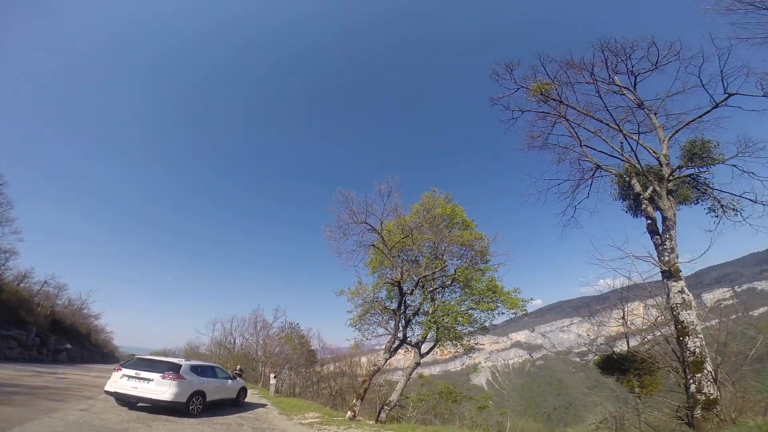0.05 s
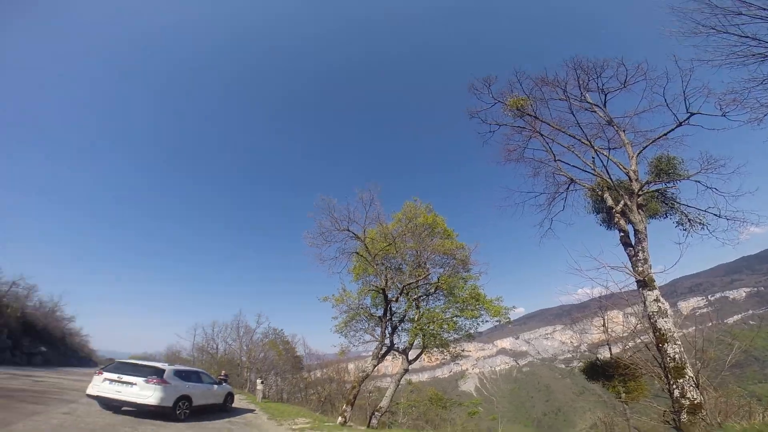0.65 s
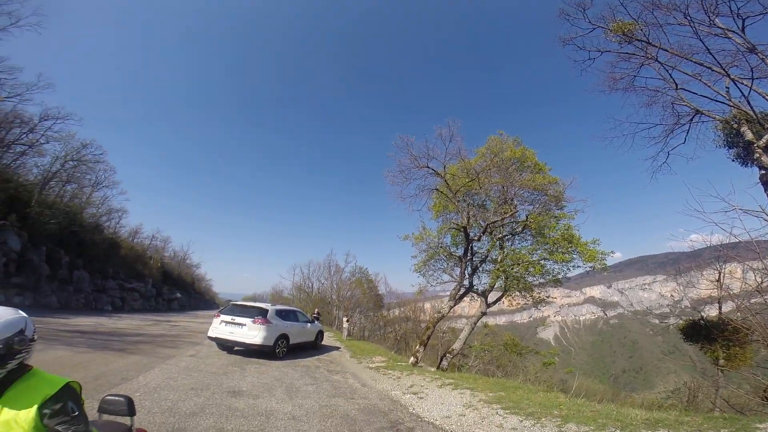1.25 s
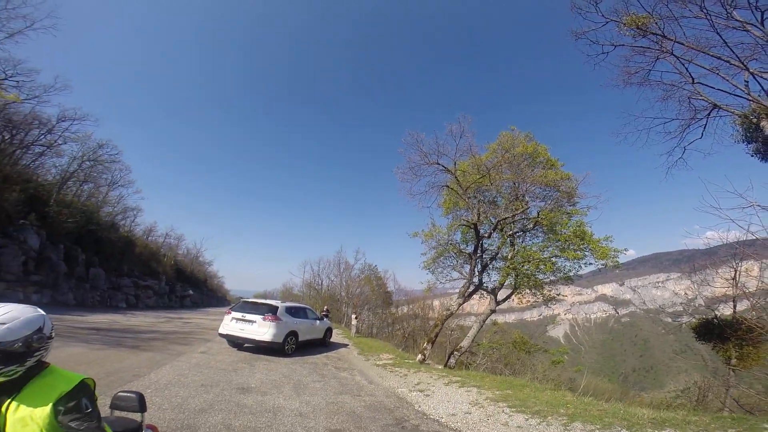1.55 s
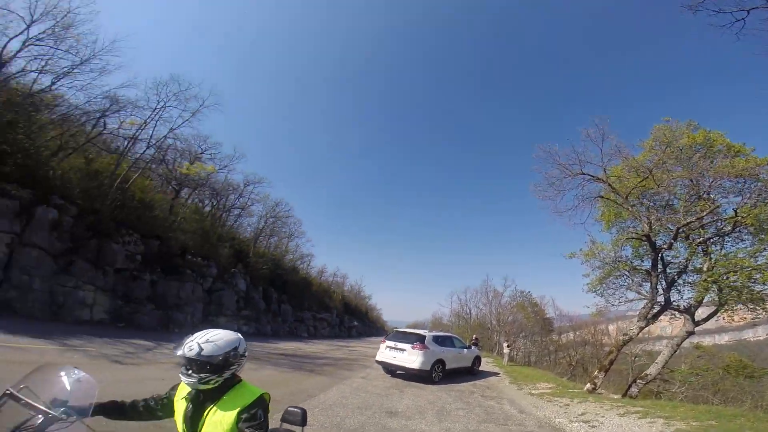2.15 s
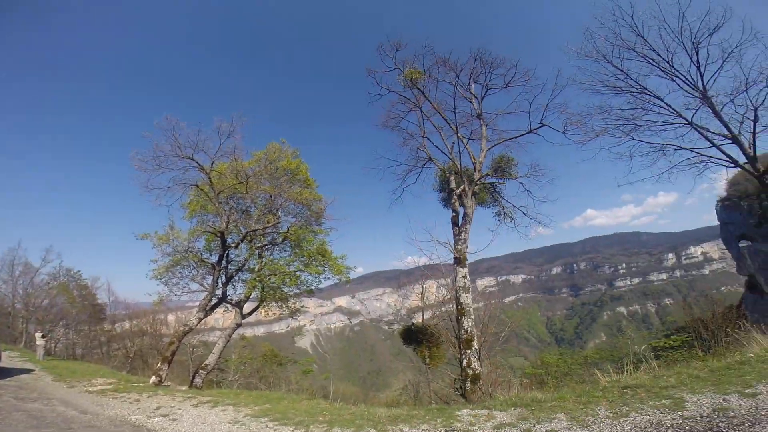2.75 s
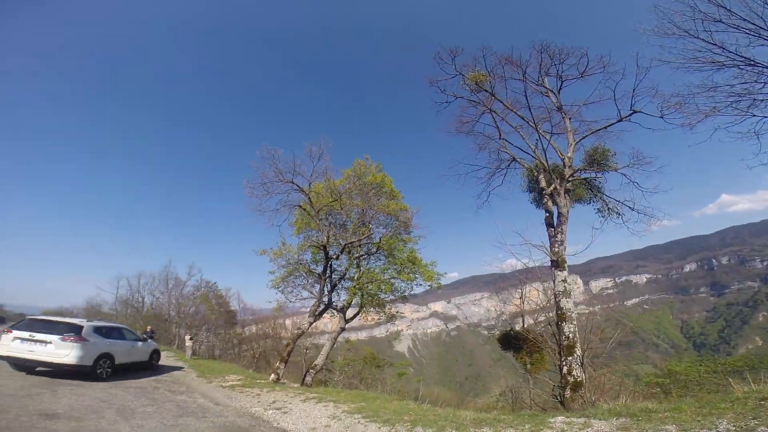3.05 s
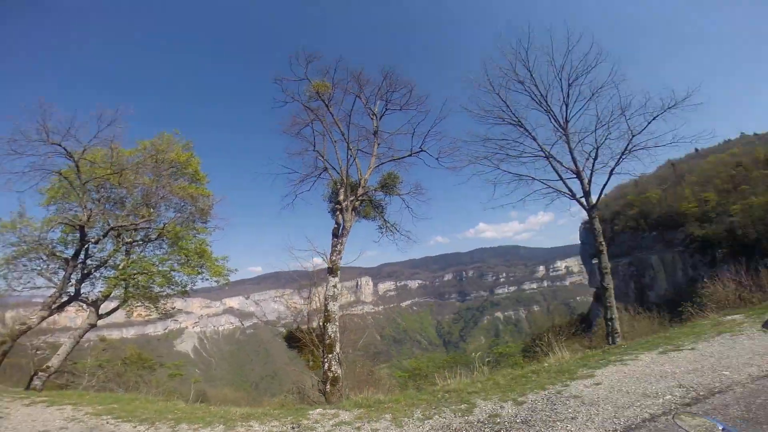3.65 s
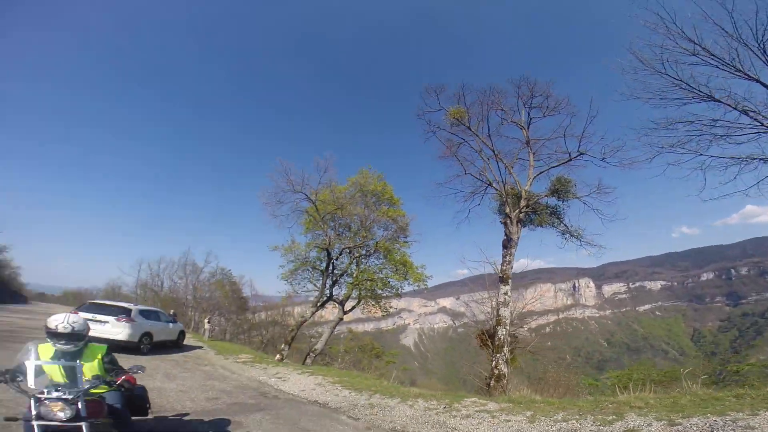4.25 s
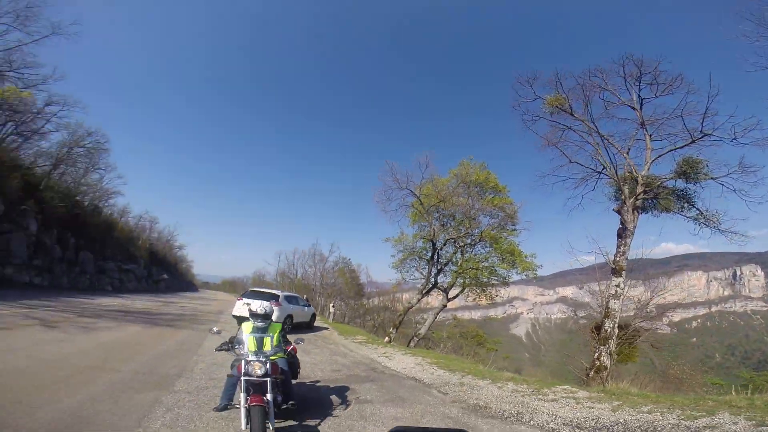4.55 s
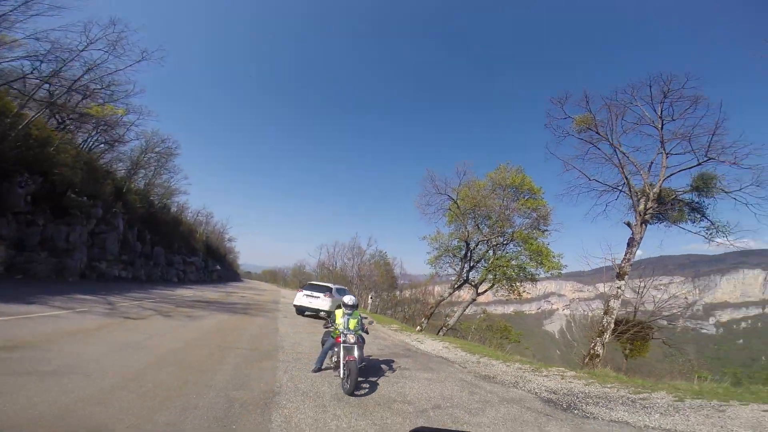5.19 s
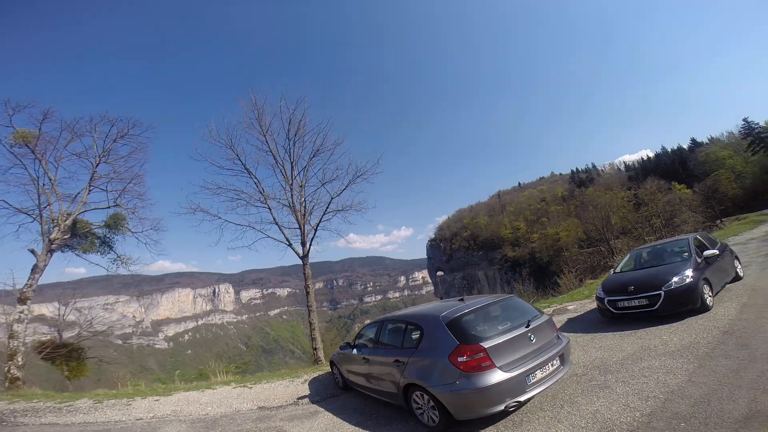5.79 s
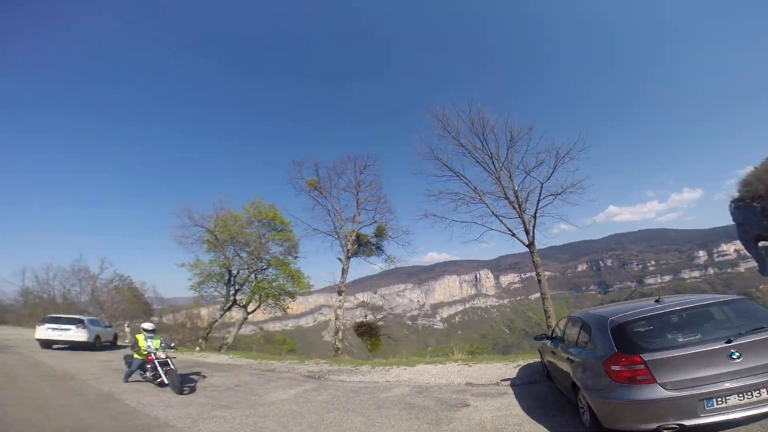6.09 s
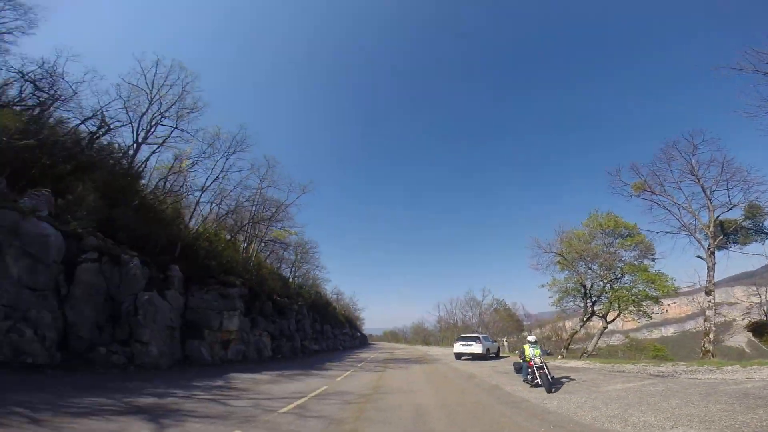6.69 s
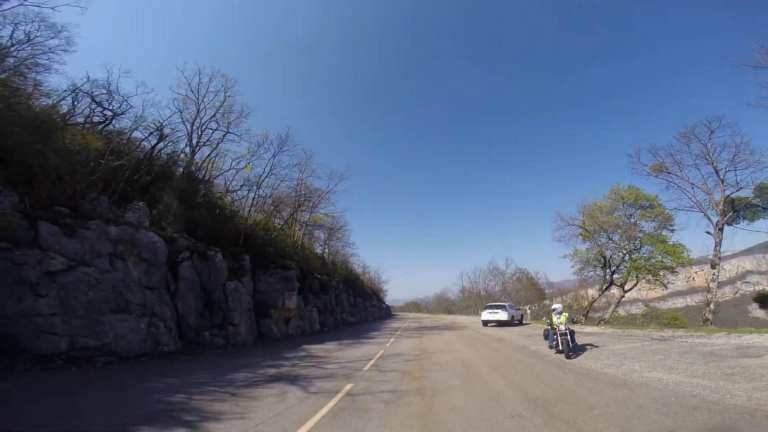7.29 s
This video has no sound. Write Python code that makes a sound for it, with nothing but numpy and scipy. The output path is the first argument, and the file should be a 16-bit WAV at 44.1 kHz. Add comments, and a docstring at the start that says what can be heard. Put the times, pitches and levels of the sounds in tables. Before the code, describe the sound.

A chugging motorcycle sputters, catches and rides off slowly, its raspy exhaust beat fading and slowing to an idle.

```python
"""By a mountain road, a V-twin motorcycle chugs at low idle, stumbles and spits, catches and pulls away,
then drops back to idle. Its two cylinders fire in uneven pairs: each firing thumps its exhaust pipe
and, under load, barks from the muffler with a jet of gas, ringing baffles and a rasp.
Sharp clacks, engine clatter, gear whine, a drone, a low rumble and a faint high whine lie underneath."""
import sys
import numpy as np
from scipy import signal
from scipy.fft import rfft, irfft, next_fast_len
from scipy.io import wavfile
from scipy.ndimage import map_coordinates

SR = 44100
rng = np.random.default_rng(int(sys.argv[2]) if len(sys.argv) > 2 else 0)


def wav_record(signal):
    """Record a signal, one row per channel, as 16-bit PCM in the file named by sys.argv[1]."""
    frames = np.transpose(np.atleast_2d(signal))
    bounded = np.clip(frames, -1, 1)
    # unit amplitude maps onto the largest positive 16-bit level
    quanta = np.round(bounded * 32767).astype(np.int16)
    wavfile.write(sys.argv[1], SR, quanta)


N = 323253
LEAVE_S = 4.19  # the bike is leaving: bark and rasp fade from here on

# crankshaft speed: time_s, speed_rpm
CRANK_SPEED = [(0.0, 1111.9), (0.66, 948.9), (1.15, 1012.2), (1.27, 1381.7), (1.67, 985.1), (1.82, 1430.5),
               (2.13, 1473.0), (2.38, 1455.3), (2.61, 1631.1), (2.99, 1676.8), (3.19, 1617.0),
               (3.5, 1633.2), (3.71, 1501.1), (4.16, 1352.4), (4.67, 1253.7), (4.91, 1304.9),
               (5.58, 1354.2), (5.95, 1302.6), (6.17, 1052.9), (6.61, 1157.9), (6.82, 953.4), (7.33, 917.2)]
# the listener swings round: time_s, facing (-1 turned away from the bike, 1 towards it)
LISTENER_FACING = [(0, 0), (3.9, 0.12), (4.35, 0.47), (4.8, 1), (5.2, 0.32), (5.6, -1), (6.2, -.8),
                   (6.6, 0)]


def crank():
    """Four-stroke cycles gone by (two turns each); whole numbers are the rear cylinder's firings."""
    return np.cumsum(curves(CRANK_SPEED)[0]) / (2 * 60 * SR) + 0.503


def firings(cycle):
    """Sample indices at which a cycle count passes a whole number."""
    return np.flatnonzero(np.diff(np.floor(cycle)) > 0)


def throttled(idle, wide_open, power=1):
    """A setting that rides the throttle from its idle value to its wide-open value."""
    # a blip that chokes, the catch, full pull, easing off, back to idle: time_s, opening (0 to 1)
    throttle = [(0, .02), (1.12, 0.05), (1.24, 0.75), (1.5, 0.12), (1.63, 0), (1.75, 0.61), (2.0, 0.38),
                (2.26, 0.36), (2.5, 0.97), (3.55, 1), (3.78, 0.9), (4.3, 0.73), (5.1, 0.59), (5.85, 0.65),
                (6.1, 0.2), (6.52, 0.15), (6.65, 0.03)]
    return idle + (wide_open - idle) * np.clip(curves(throttle)[0], 0, 1) ** power


def choking():
    """1 while the engine stumbles after the blip, else 0."""
    return (since(1.31) > 0) * (since(1.61) == 0)


def uneven_burn(reach=512):
    """Change in dB of thump and of bark where the engine chokes, misfires or cracks out."""
    # firings that barely burn: time_s, thump_lost_db, bark_lost_db
    misfires = [(.47, 8, 6), (1.52, 1, 21), (1.58, 9, 8), (6.65, -0.5, 13), (6.83, 6, 4), (7.08, 16, 4),
                (7.13, 2, 5)]
    # firings that crack harder than their neighbours: time_s, extra_bark_db
    cracks = [(1.745, 2), (2.49, 0), (2.538, 3), (2.61, 3.5), (2.642, 1), (2.685, 2.5), (2.757, 3.5),
              (2.903, 4), (3.074, -0.5), (3.444, -0.5), (3.914, 3.5), (3.997, 2), (4.968, 2.5), (5.37, 2.5),
              (5.82, 5)]
    thump_db, bark_db = -8.5 * choking(), np.zeros(N)
    for time_s, thump_lost_db, bark_lost_db in misfires:
        add(thump_db, time_s * SR - reach, np.full(2 * reach, -thump_lost_db))
        add(bark_db, time_s * SR - reach, np.full(2 * reach, -bark_lost_db))
    for time_s, extra_db in cracks:
        add(bark_db, time_s * SR - reach, np.full(2 * reach, extra_db))
    return thump_db, bark_db


def exhaust(cycle, front_lead=0.405):
    """The front cylinder fires, then the rear, then a longer gap; the throttle sets their punch."""
    # modes of each cylinder's exhaust pipe: pitch_hz, width_hz, level_db
    rear_pipe = [(71.7, 25.4, 13), (87.9, 40, 11.5), (106.2, 61, 6.5), (174.4, 50, 12.5), (285, 22, 2.5)]
    front_pipe = [(61.4, 11, 3.5), (158.9, 18.4, 11), (116, 40, -0.5), (263.4, 40, 8.5)]
    thump_db, bark_db = uneven_burn()
    bark_db -= 1.66 * since(LEAVE_S)
    rear, front = firings(cycle), firings(cycle + front_lead)
    out = thumps(rear, throttled(-25, -17.5, 0.81) + thump_db, rear_pipe, scatter_db=0.1, detune=0.0032)
    out += thumps(front, throttled(-33, -19.5, 0.47) + thump_db, front_pipe, scatter_db=0.6, detune=0.0019)
    out += muffler(rear, throttled(-42.5, -25.5, 0.97) + bark_db)
    out += muffler(front, throttled(-55.5, -28, 0.7) + bark_db)
    return out


def push_sharpness(idle_hz=143, open_hz=236, turn_start_s=2.2, turn_length_s=1.8):
    """Bandwidth in Hz of each push of gas: wider under throttle, narrower as the pipe turns away."""
    turned = np.minimum(since(turn_start_s) / turn_length_s, 1)
    return idle_hz + throttled(0, open_hz - idle_hz, 0.38) * (1 - 0.76 * turned)


def thumps(starts, level_db, pipe, scatter_db, detune, size=6144):
    """Each push of gas rings the pipe; gas heat shifts the pitch a little from firing to firing."""
    hz, out = np.fft.rfftfreq(size, 1 / SR), np.zeros(N)
    lead = size // 16  # samples of room for the push to swell
    push_hz = push_sharpness()
    for start in starts:
        chance = rng.standard_normal(len(pipe) + 1)
        push = np.exp(-(hz / push_hz[start]) ** 2 - 2j * np.pi * hz * lead / SR)
        modes = sum((-1) ** k * amp(db) * resonance(hz, pitch * (1 + detune * chance[k]), width)
                    for k, (pitch, width, db) in enumerate(pipe))
        thump = irfft(modes * push)
        peak = amp(level_db[start] - scatter_db * chance[-1])
        add(out, start - lead, peak * thump / np.abs(thump).max())
    return out


def muffler(starts, level_db):
    """One cylinder's bark: a jet through the shell, ringing baffles and a rasp that builds just after."""
    # colours of the gas jet and of the rasp at the pipe's mouth: frequency_hz, level_db
    jet_colour = [(120, -8.5), (290, -8.5), (450, -9.5), (620, -21.5), (950, -6), (1200, -6), (1310, -11.5),
                  (1500, 3), (2700, 0), (3450, 3.5), (4000, -9), (6800, -33), (15000, -45)]
    rasp_colour = [(1500, -4.5), (3700, -30), (4700, 4.5), (5500, -2.5), (6400, 4.5), (7200, -0.5),
                   (8200, -12), (11000, -12.5), (13000, -24), (15000, -32)]
    # resonances of the muffler shell: pitch_hz, width_hz, level_db
    shell_modes = [(504, 33, 6), (821, 22, 10.5), (998, 84, 5), (1139.5, 30, 14.5), (1886, 44, -4),
                   (2227, 49, -1.5), (2467, 23, 2.5), (3075, 91, 4), (4400, 56, 5), (4660, 170, -12),
                   (6000, 190, -12)]
    rasp_db = level_db + throttled(-8, -9.5) - 2.2 * since(LEAVE_S)
    rasp_db += 2.5 * curves(LISTENER_FACING)[0]
    jet = barks(starts, level_db + 1, rise_s=0.0012, t60_s=0.048, tail_db=-24, tail_t60_s=0.74,
                scatter_db=0.25, patchy_db=4.5)
    rasp = barks(starts, rasp_db, rise_s=0.0047, t60_s=0.039, tail_db=-24.5, tail_t60_s=0.17,
                 scatter_db=3, patchy_db=4)
    gas = ringing(jet, jet_colour, shell_modes) + ringing(rasp, rasp_colour)
    return gas + baffle_pings(starts, level_db)


def barks(starts, level_db, rise_s, t60_s, tail_db, tail_t60_s, scatter_db, patchy_db, size=8192):
    """Each opening exhaust valve frees a turbulent burst with its own colour and a weak scattered tail."""
    t, out = np.arange(size) / SR, np.zeros(N)
    attack = 1 - np.exp(-(t / rise_s) ** 2)
    decay = amp(-60 * t / t60_s) + amp(tail_db - 60 * t / tail_t60_s)
    knots = np.fft.rfftfreq(size, 1 / SR) / 330  # a new random level every 330 Hz
    for start in starts:
        colour_db = patchy_db * map_coordinates(rng.standard_normal(int(knots[-1]) + 2), [knots])
        puff = attack * decay * rng.standard_normal(size)
        burst = irfft(rfft(puff) * amp(colour_db))[:size // 2]
        add(out, start, burst * amp(level_db[start] + scatter_db * rng.standard_normal()))
    return out


def baffle_pings(starts, level_db, scatter_db=5, rise_s=0.0045, pivot_hz=1950):
    """The pressure front strikes the baffles; each tone's strength and pitch vary with every firing."""
    # tones of the muffler baffles: pitch_hz, level_db, t60_s, pitch_scatter (share)
    baffle_tones = [(742.4, -14, 0.12, 0.005), (845.5, -12, 0.14, .003), (1068, 0.5, 0.061, 0.018),
                    (1151, -1, 0.087, 0.005), (1780, -3.5, 0.08, 0.0517), (2630, -0.5, 0.042, 0.0617),
                    (3133, 0.5, 0.044, 0.0056), (3286, 7.5, 0.027, 0.025)]
    hz, db, t60_s, detune = np.transpose(baffle_tones)[:, :, None]
    t, out = np.arange(SR // 8) / SR, np.zeros(N)
    attack = 1 - np.exp(-(t / rise_s) ** 2)
    tilt_db_per_octave = 3.5 + 5 * curves(LISTENER_FACING)[0]  # brighter when facing the bike
    for start in starts:
        strength, shift = rng.standard_normal((2, len(baffle_tones), 1))
        tone_db = db + scatter_db * np.tanh(strength) + tilt_db_per_octave[start] * np.log2(hz / pivot_hz)
        tones = amp(tone_db - 60 * t / t60_s) * np.sin(2 * np.pi * hz * (1 + detune * shift) * t)
        add(out, start, amp(level_db[start]) * attack * tones.sum(0))
    return out


def clacks(rise_s=0.00066):
    """Short, dry bursts: metallic clacks, and the spit of the stumbling engine."""
    # clacks and spits: start_s, level_db, t60_s
    hits = [(0.943, -25.5, 0.026), (0.952, -40, 0.033), (1.321, -31.5, 0.083), (1.329, -37.5, 0.15),
            (1.380, -54, 0.92), (1.409, -42, 0.054), (2.288, -28, 0.048), (2.321, -30.5, 0.091),
            (2.367, -27, 0.028), (4.108, -32, 0.093), (4.283, -39, 0.05), (4.304, -32, 0.071),
            (5.39, -31, 0.04), (6.248, -26.5, 0.025)]
    # their broad colour: frequency_hz, level_db
    colour = [(200, -3), (600, 2), (1080, 7.5), (1320, 2.5), (1800, 1), (3200, 2.5), (4200, -11),
              (6800, -34), (9000, -41), (15000, -47)]
    # ring of the struck metal: pitch_hz, width_hz, level_db
    metal_modes = [(1130, 58, 6), (1750, 97, 9.5)]
    t, envelope = np.arange(SR // 3) / SR, np.zeros(N)
    attack = 1 - np.exp(-t / rise_s)
    for start_s, level_db, t60_s in hits:
        add(envelope, start_s * SR, attack * amp(level_db - 60 * t / t60_s))
    return ringing(envelope * rng.standard_normal(N), colour, metal_modes)


def valve_clatter(cycle, idle_rpm=1000, db_per_doubling=10.5):
    """Valve gear rattles louder with crank speed, flickering and swelling slightly with each turn."""
    # colour of the clatter: frequency_hz, level_db
    colour = [(150, 16.5), (300, 6), (560, 1), (750, 1.5), (1050, 5), (1190, 5), (1310, -7), (1480, 2),
              (1850, 3), (2300, -1), (3200, 2), (4000, -13.5), (4600, -11), (5500, -16.5), (6400, -14.5),
              (8500, -29.5), (15000, -37)]
    level_db = -48 + db_per_doubling * np.log2(curves(CRANK_SPEED)[0] / idle_rpm) + 1.2 * choking()
    swell_db = 0.3 * np.cos(4 * np.pi * cycle) + 1.67 * wobble(140)
    return amp(level_db + swell_db) * noise(colour)


def engine_drone():
    """A low drone fills the gaps between firings, lifting with the throttle and in the stumble."""
    # colour of the drone: frequency_hz, level_db
    colour = [(25, -34), (42, -34), (54, -24), (70, 0), (105, -4), (140, -6.5), (200, -3), (270, -8.5),
              (380, -28.5), (900, -67)]
    return amp(throttled(-45, -42.5, 0.88) + 1.2 * choking()) * noise(colour)


def gear_whine():
    """Meshing gears sing out for moments, gliding a little under a fluttering load."""
    # swells of whine: centre_s, half_length_s, pitch_hz, glide_hz_per_s, level_db
    swells = [(3.35, .3, 454, -0.5, -56.5), (4.169, .15, 384, -89, -57.5), (4.78, 0.23, 380.3, 114.5, -54)]
    t, out = np.arange(N) / SR, np.zeros(N)
    flutter_db, waver = 0.9 * wobble(25.4), 0.9 * wobble(40)
    for centre_s, half_length_s, pitch_hz, glide, level_db in swells:
        phase = 2 * np.pi * np.cumsum(pitch_hz + glide * (t - centre_s)) / SR
        envelope = amp(level_db + flutter_db) * np.exp(-((t - centre_s) / half_length_s) ** 2)
        out += np.sqrt(2) * envelope * np.sin(phase + waver)
    return out


def idle_singing(fade_start_s=1.44, fade_db_per_s=44):
    """A thin metallic singing over the opening idle, dying away as the engine catches."""
    band = filtered(rng.standard_normal(N), lambda hz: resonance(hz, centre=2216, width=91) ** 2)
    return amp(-59 - fade_db_per_s * since(fade_start_s)) * unit(band)


def rumble():
    """A deep rumble swells and sinks under the bike."""
    # colour of the rumble: frequency_hz, level_db
    colour = [(10, -14), (22, -3), (28, 0), (34, -14), (42, -34), (70, -50), (300, -90)]
    # its rise and fall: time_s, level_db
    levels = [(0.0, -44), (1.24, -49), (1.37, -42), (2.55, -47), (2.82, -42), (3.59, -63), (3.71, -38),
              (4.18, -45), (6.8, -45), (7.33, -51)]
    return amp(curves(levels)[0]) * noise(colour)


def microphone_hiss():
    """The faint, even hiss of the microphone."""
    # colour of the hiss: frequency_hz, level_db
    colour = [(200, 6.5), (600, 17.5), (1500, 5), (5000, -6), (7000, -6), (9000, 1.5), (12000, -5.5),
              (15000, -16)]
    return amp(-68) * noise(colour)


def electronic_whine():
    """Electronics give off thin, steady tones high in the treble."""
    # whine tones: pitch_hz, level_db
    tones = [(11688, -88), (11718, -83), (14626, -92)]
    t = np.arange(N) / SR
    return sum(np.sqrt(2) * amp(db) * np.sin(2 * np.pi * hz * t) for hz, db in tones)


def amp(db):
    """Decibels to gain."""
    return 10 ** (np.asarray(db) / 20)


def unit(x):
    """Scale to rms 1."""
    return x / np.sqrt(np.mean(x ** 2) + 1e-20)


def since(time_s):
    """Seconds gone by since a moment, 0 before it."""
    return np.maximum(np.arange(N) / SR - time_s, 0)


def colour_gain(colour, hz):
    """Gain of a (frequency_hz, level_db) colour, read on a log frequency axis."""
    points_hz, db = np.transpose(colour)
    return amp(np.interp(np.log(hz + 1), np.log(points_hz + 1), db))


def curves(rows):
    """One value per sample for each column after the time."""
    time_s, *columns = np.transpose(rows)
    return [np.interp(np.arange(N) / SR, time_s, column) for column in columns]


def wobble(rate):
    """A smooth random curve with rate knots a second."""
    knots, steps = rng.standard_normal(int(N * rate / SR) + 4), np.arange(0, N, 20)
    return np.interp(np.arange(N), steps, map_coordinates(knots, [steps * rate / SR]))


def filtered(x, response):
    """Shape x with a complex frequency response."""
    size = next_fast_len(N + SR // 2)
    return irfft(rfft(x, size) * response(np.fft.rfftfreq(size, 1 / SR)), size)[:N]


def noise(colour):
    """Coloured noise of rms 1."""
    size = next_fast_len(N)
    hz = np.fft.rfftfreq(size, 1 / SR)
    real, imaginary = rng.standard_normal((2, len(hz)))
    return unit(irfft((real + 1j * imaginary) * colour_gain(colour, hz), size)[:N])


def resonance(hz, centre, width):
    """Response of one damped mode, 1 at its centre."""
    return 1j * hz * width / (centre ** 2 - hz ** 2 + 1j * hz * width)


def ringing(x, colour, modes=(), size=8192):
    """Pass x through a causal, power-keeping filter: a broad colour with resonances on top."""
    hz = np.fft.rfftfreq(size, 1 / SR)
    cepstrum = irfft(np.log(colour_gain(colour, hz)))
    cepstrum[1:size // 2] *= 2  # minimum phase: nothing rings ahead of the hit
    cepstrum[size // 2 + 1:] = 0
    peaks = 1 + sum(amp(db) * resonance(hz, pitch, width) for pitch, width, db in modes)
    response = irfft(np.exp(rfft(cepstrum)) * peaks)
    return signal.fftconvolve(x, response / np.linalg.norm(response))[:N]


def add(track, start, sound):
    """Mix a sound into the track from a sample index on."""
    start = max(int(start), 0)
    part = track[start:start + len(sound)]
    part += sound[:len(part)]


def scene():
    """The crankshaft paces exhaust and clatter; the other engine sounds, rumble and hiss join in mono."""
    cycle = crank()
    bike = exhaust(cycle) + gear_whine() + clacks() + valve_clatter(cycle) + idle_singing() + engine_drone()
    return (bike + rumble() + microphone_hiss())[None]


def record(dry, top_hz=15100):
    """Add the faint electronic whine and cut the highest treble."""
    return filtered(dry[0] + electronic_whine(), lambda hz: hz < top_hz)[None]


dry = scene()
out = record(dry)
wav_record(out)
```